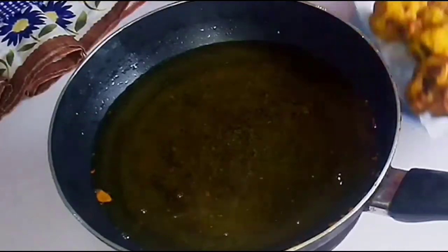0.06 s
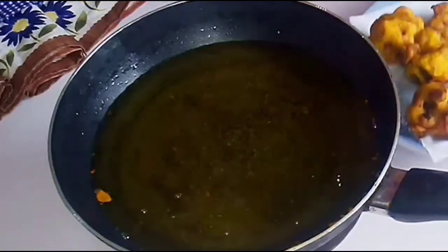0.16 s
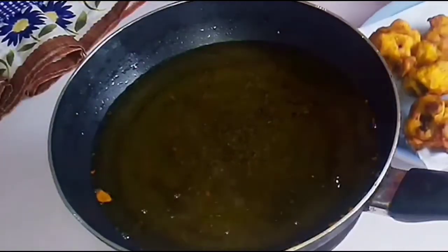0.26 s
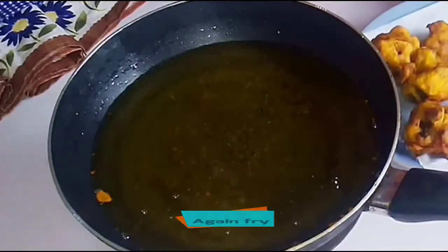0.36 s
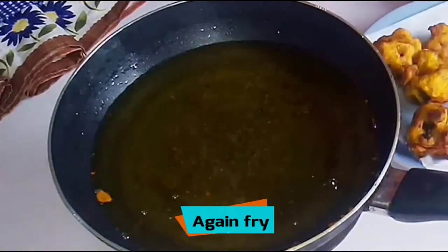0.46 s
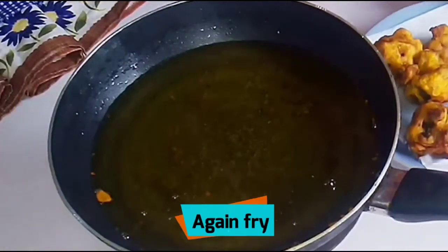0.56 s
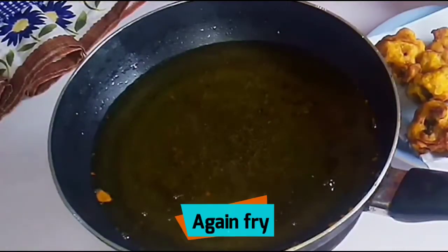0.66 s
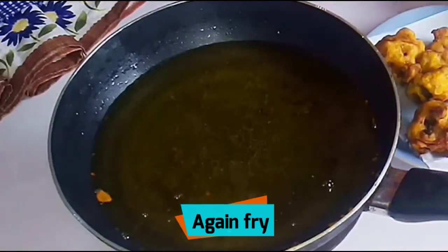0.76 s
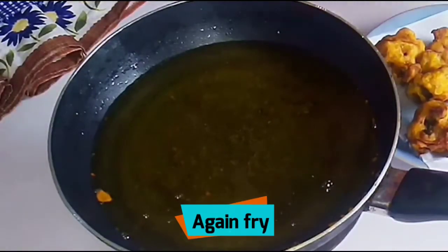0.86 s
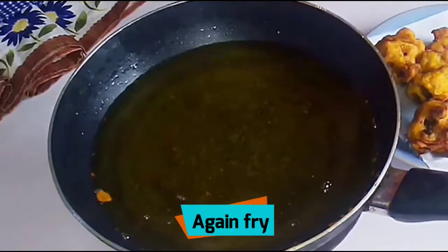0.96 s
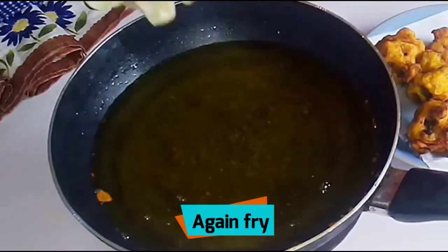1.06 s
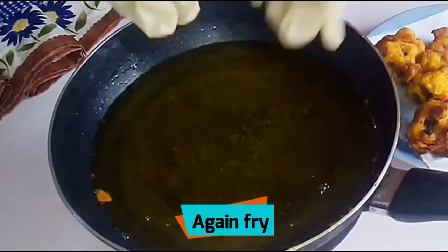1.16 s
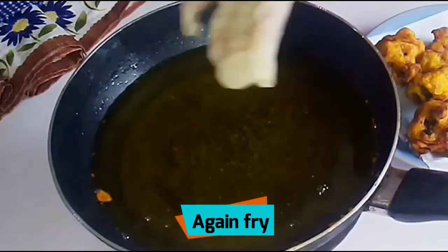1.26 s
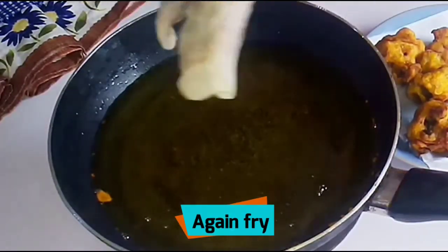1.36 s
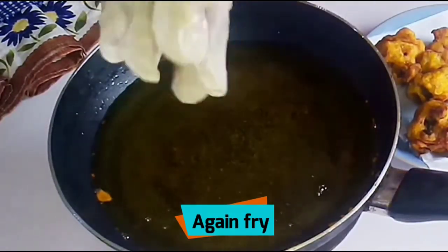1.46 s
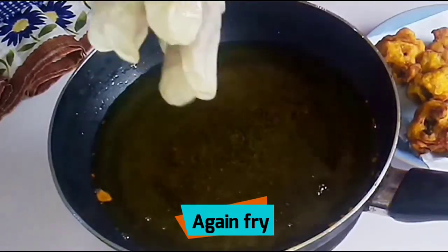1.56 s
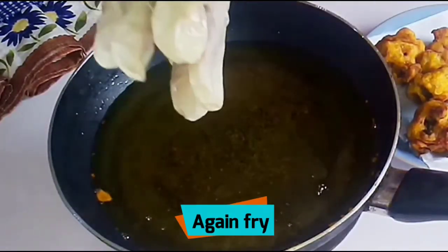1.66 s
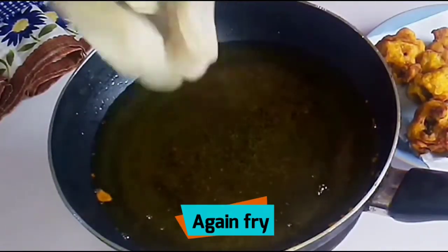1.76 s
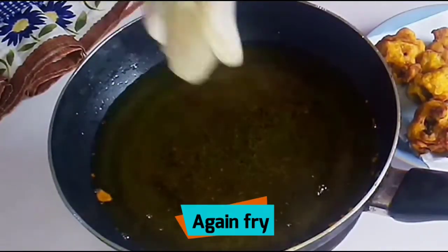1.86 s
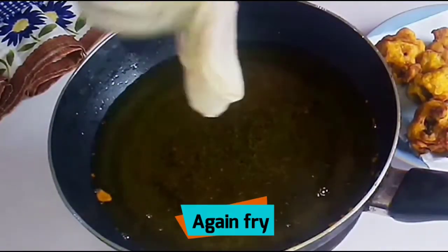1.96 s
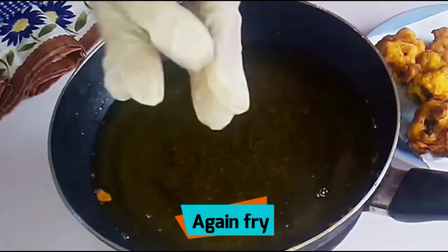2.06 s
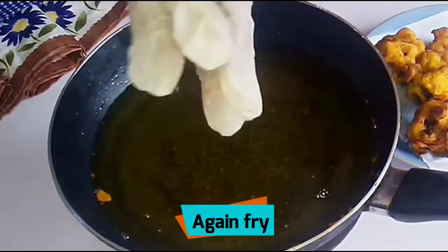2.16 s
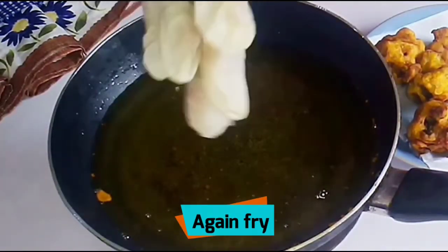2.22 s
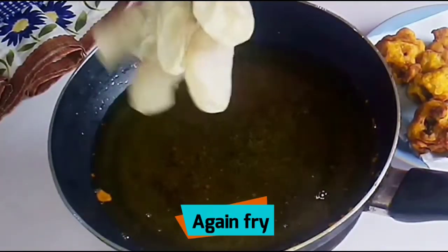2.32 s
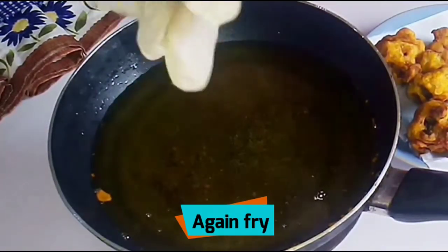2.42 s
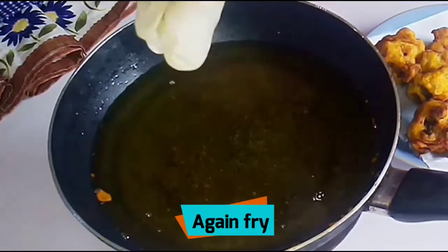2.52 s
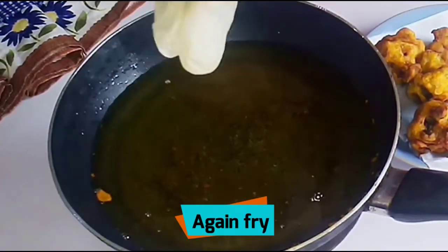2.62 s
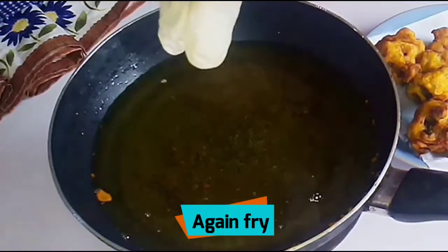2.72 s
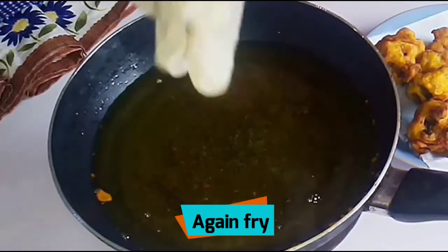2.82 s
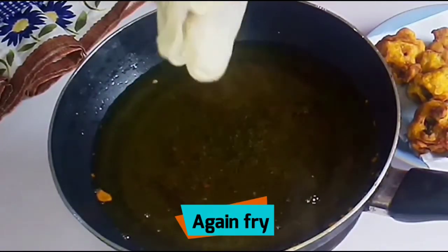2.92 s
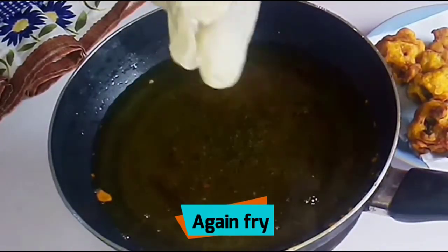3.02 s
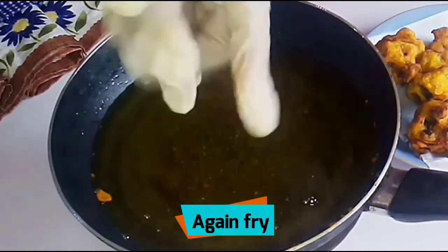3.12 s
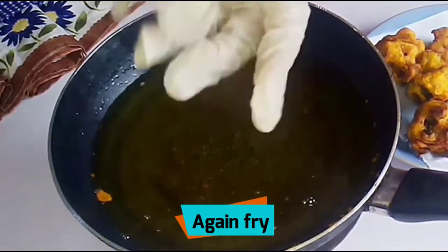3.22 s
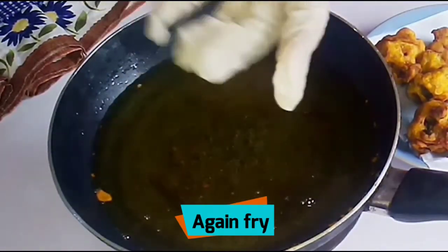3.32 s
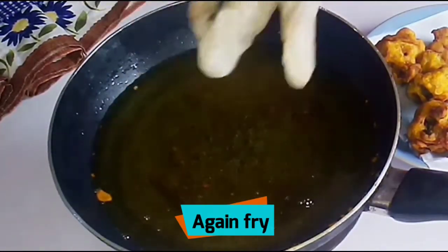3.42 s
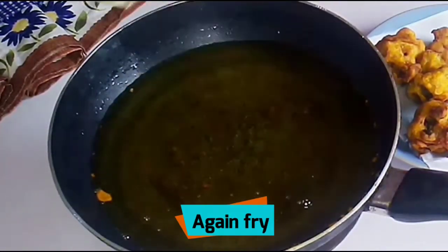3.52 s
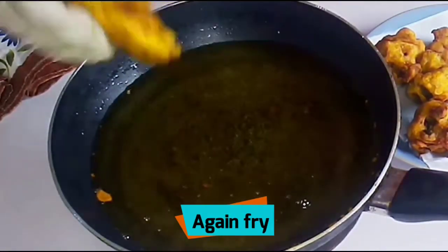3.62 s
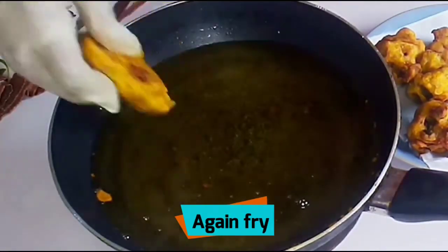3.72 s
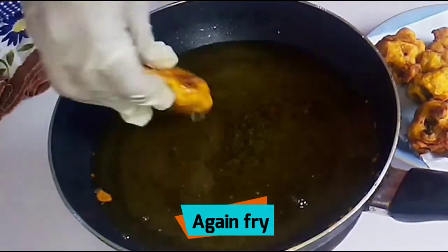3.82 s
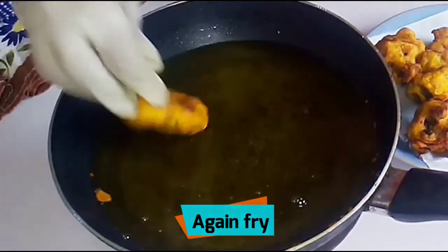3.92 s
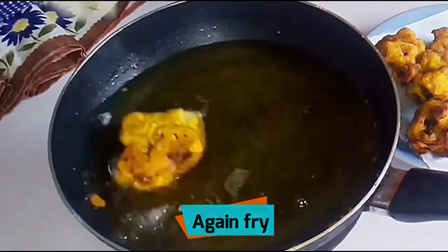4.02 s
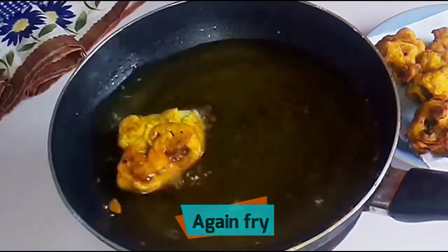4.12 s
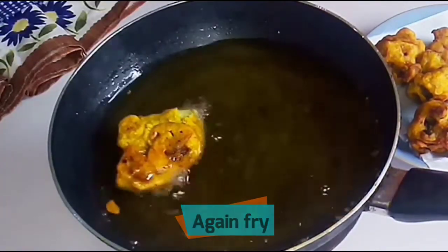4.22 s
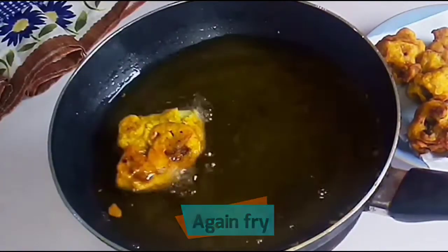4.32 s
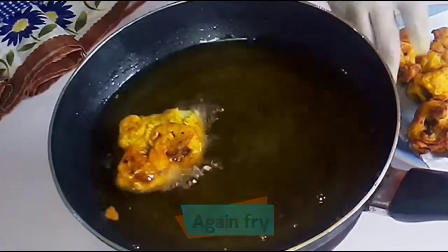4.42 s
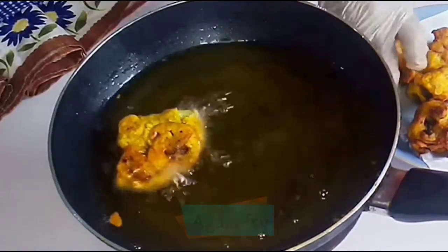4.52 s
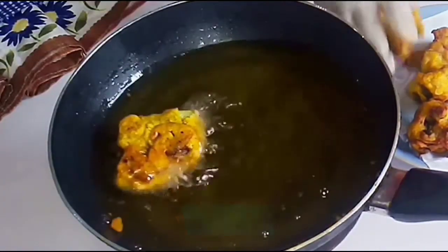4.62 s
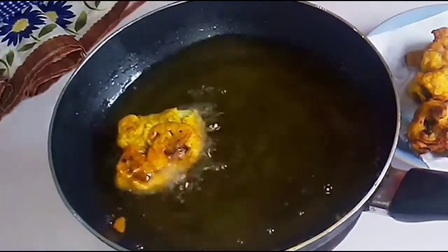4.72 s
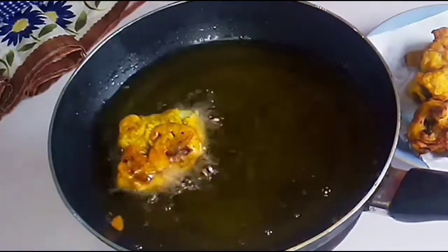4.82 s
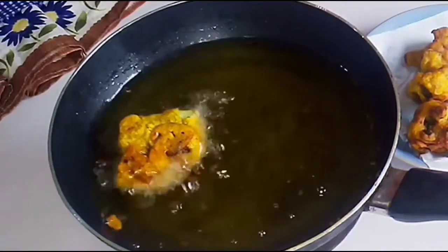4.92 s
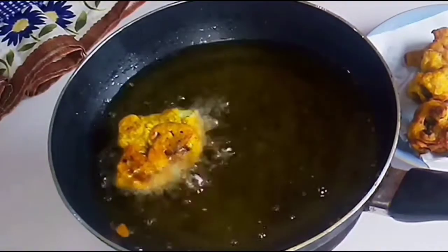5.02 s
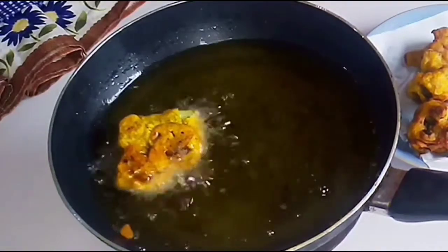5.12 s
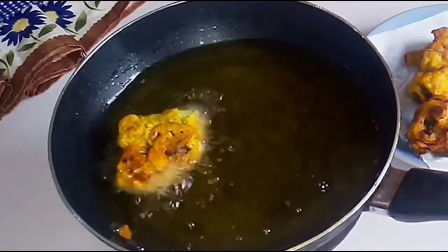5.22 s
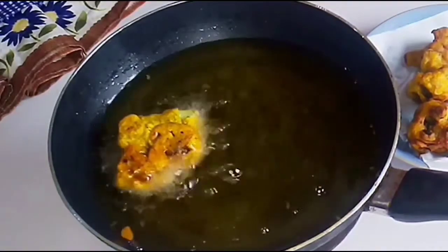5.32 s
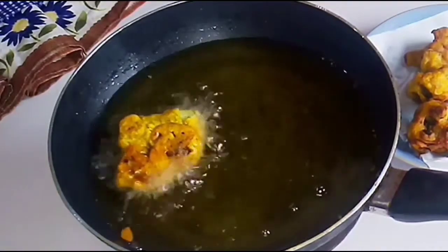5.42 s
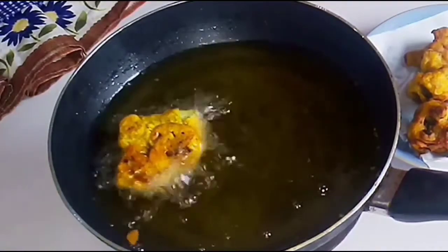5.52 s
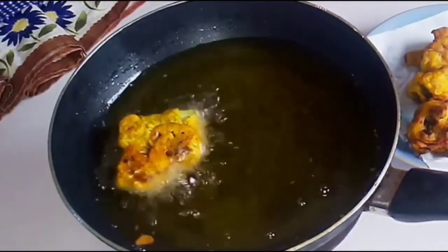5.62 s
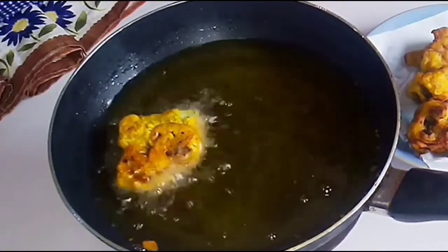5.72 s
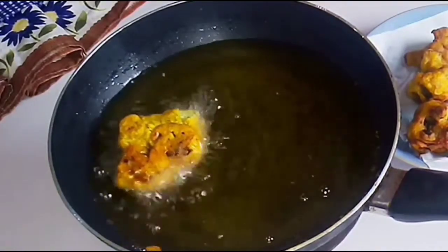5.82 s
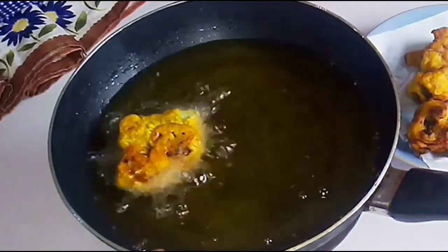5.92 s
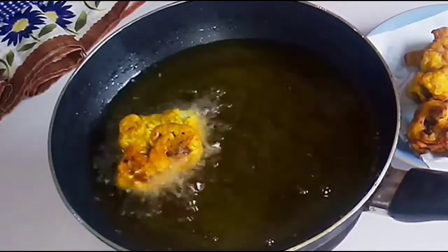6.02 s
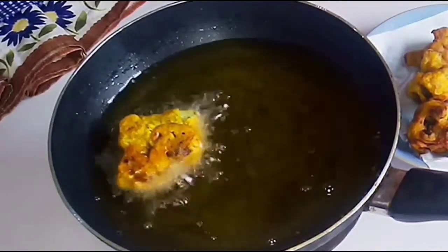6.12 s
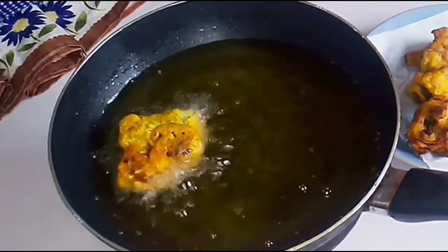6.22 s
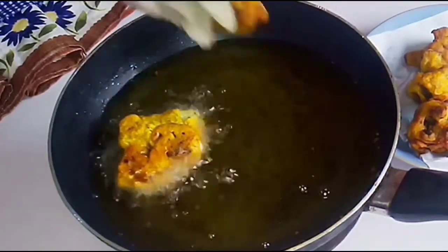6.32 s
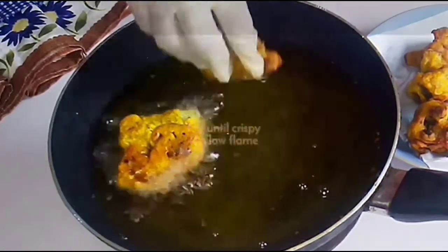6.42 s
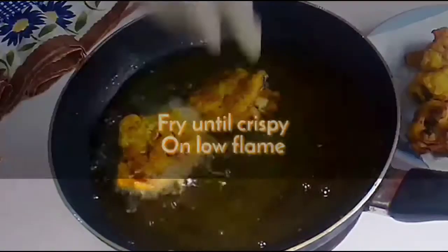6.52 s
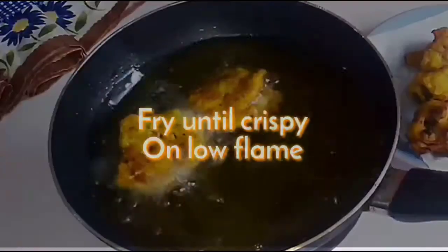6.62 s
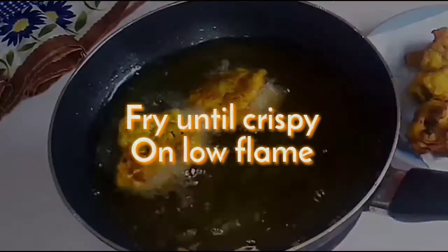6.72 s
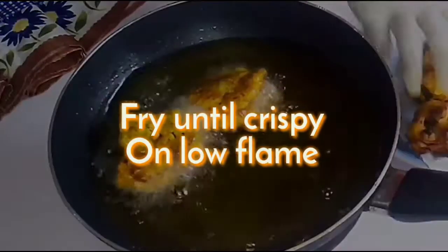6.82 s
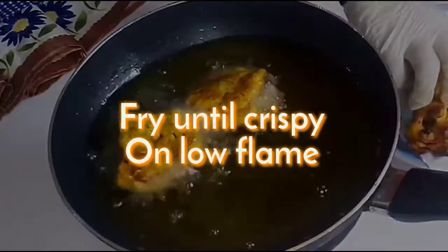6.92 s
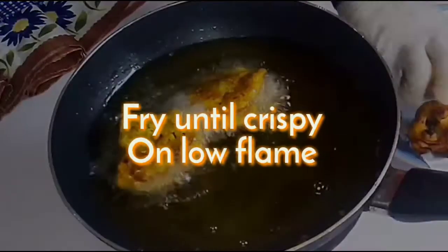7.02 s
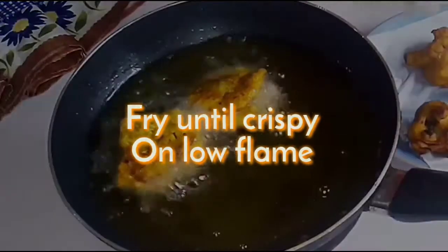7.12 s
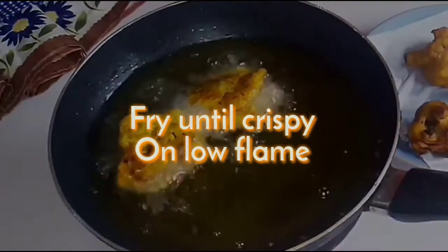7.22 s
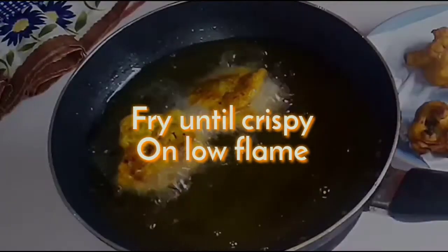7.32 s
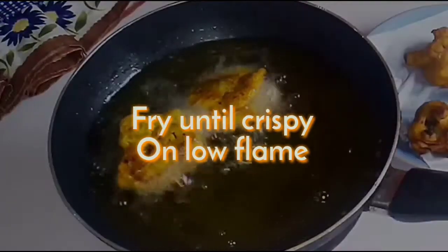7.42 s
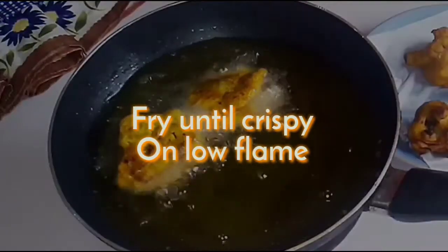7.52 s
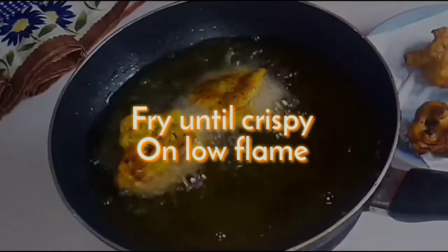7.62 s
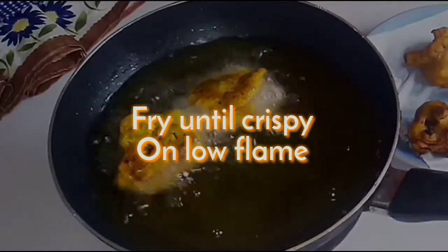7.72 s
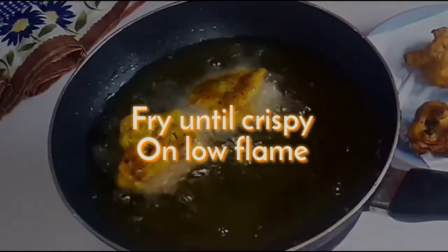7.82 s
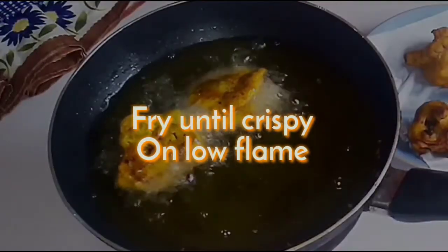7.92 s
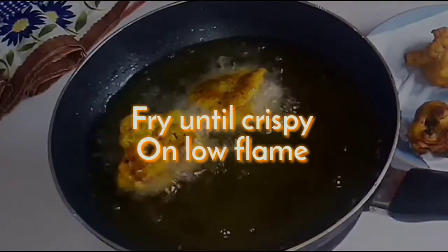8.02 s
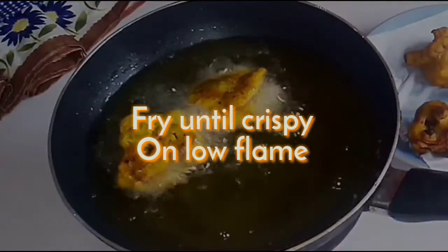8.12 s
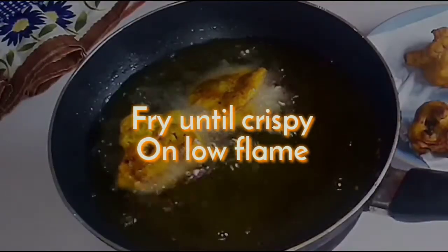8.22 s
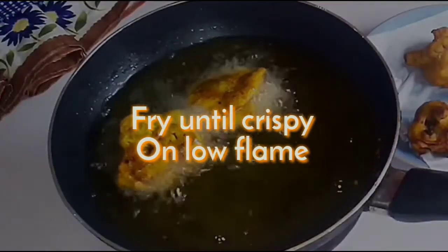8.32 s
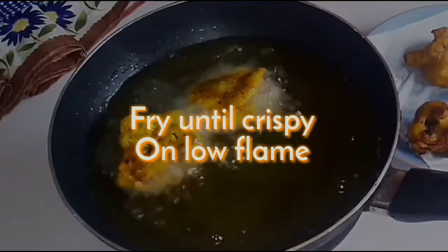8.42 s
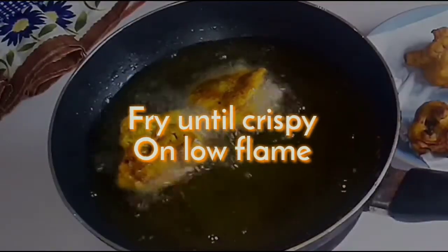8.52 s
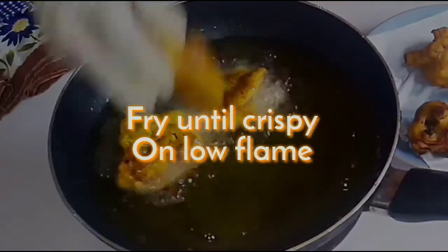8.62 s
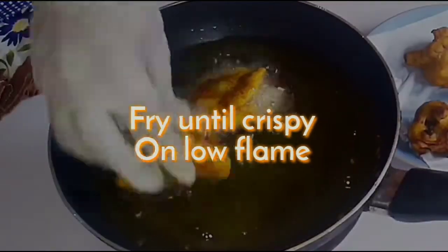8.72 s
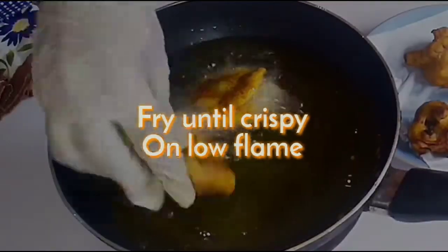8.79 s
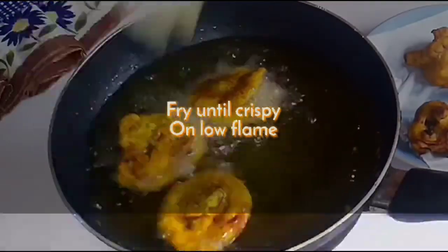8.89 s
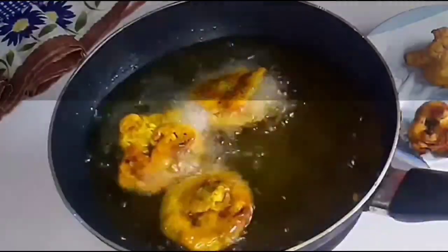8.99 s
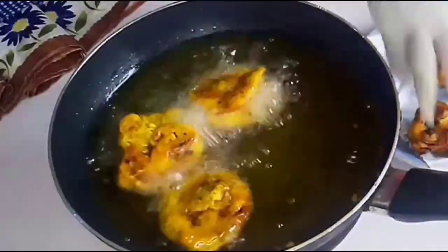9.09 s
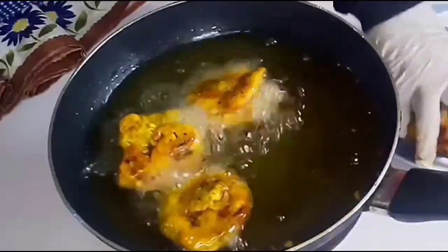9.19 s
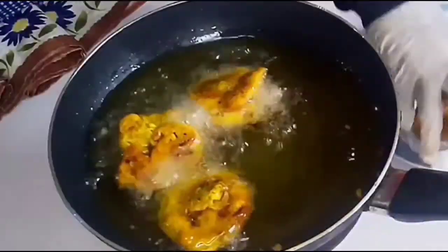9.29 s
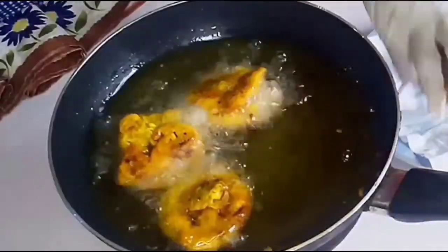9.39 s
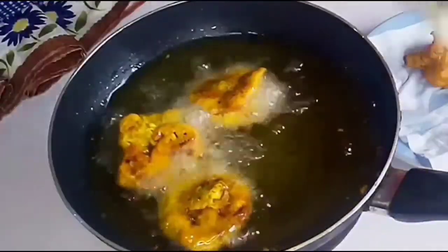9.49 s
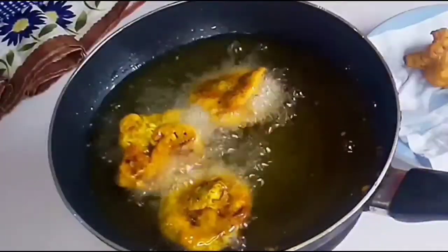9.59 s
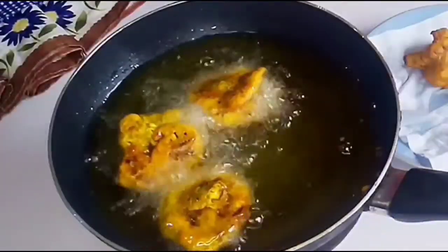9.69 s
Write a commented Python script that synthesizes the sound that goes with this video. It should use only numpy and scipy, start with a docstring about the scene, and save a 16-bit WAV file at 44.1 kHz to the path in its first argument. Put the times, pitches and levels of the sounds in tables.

```python
"""A battered fritter frying in a pan of hot oil, close to a stereo microphone and a little to its right.
Faint, echoing birdsong is heard first; after four seconds the frying fades in over two seconds.
Steam leaving the batter makes a dense fry of tiny bursts, ringing bubbles, splutters and popping spits
in a small kitchen, over churning oil and the ringing pan. It surges and lulls, then eases and dulls
a little as the crust dries. A faint hiss lies under it all."""
import sys
import numpy as np
from scipy import signal
from scipy.fft import rfft, irfft, next_fast_len
from scipy.io import wavfile
from scipy.ndimage import uniform_filter1d

SR = 44100
rng = np.random.default_rng(int(sys.argv[2]) if len(sys.argv) > 2 else 0)


def store_wav(level_fs):
    """Save 16-bit WAV to argv[1]."""
    pcm = np.round(np.clip(np.atleast_2d(level_fs), -1, 1) * 32767)
    wavfile.write(sys.argv[1], SR, pcm.T.astype(np.int16))


N = 429975
TIME = np.arange(N) / SR

FRY_START_S = 4.104
OPENING_END_S, OPENING_DB = 4.195, -1.5   # the first moment of the sizzle is a little weaker
# The sizzle fades in over two seconds to its full level, then eases as the crust dries.
FULL_DB, FADE_DEPTH_DB, FADE_TIME_CONSTANT_S, DRYING_DB_PER_S = -25.5, 24.5, 0.68, 0.4472
WET_TREBLE_DB, DULLING_DB_PER_S, TREBLE_HZ = 1.37, 0.2, 7060   # a wet crust spits brighter
# The low churning, relative to the sizzle: it starts weaker, catches up, then eases.
GURGLE_DB, GURGLE_ONSET_DB, GURGLE_BUILD_S, GURGLE_EASING_DB_PER_S = -15, -3.5, 0.14, 0.53
LEFT_LAG_S, CUTOFF_HZ = 5.6e-5, 15400   # delay of the microphone's left side; top of the treble
HIGH_PHRASE_END_S, HIGH_PHRASE_HZ = 2.575, 5800   # the highest bird notes break off here, echo and all

# Spectra of the sizzle, the churning oil and the faint hiss. Each row: frequency in Hz, level in dB.
SIZZLE_SPECTRUM = [(650, -29.5), (1100, -17.5), (1340, -19), (1460, -31), (1580, -47), (1820, -14),
                   (2450, -6), (3230, -3), (3680, 0), (5180, -1), (6740, -2.5), (10600, -4), (14200, -9),
                   (15200, -11)]
GURGLE_SPECTRUM = [(20, -14), (32, -3), (60, -8.5), (85, -8), (160, -9.5), (279, -11.5), (486, -9.5),
                   (591, -6.5), (794, -8.5), (905, -6.5), (1300, -9), (1450, -1), (1800, -1), (2340, -60),
                   (3960, -120)]
HISS_SPECTRUM = [(60, 1), (150, -13), (350, -6), (900, -5), (1400, -2.5), (2200, 9.5), (4000, -5),
                 (6500, -12), (15000, -21)]
# Surges and lulls of the steam.
# Each row: centre in seconds, half length in seconds, level change in dB, treble change in dB.
STEAM_SURGES = [(4.28, 0.025, 2.5, -0.5), (4.357, 0.02, 2, 0.5), (4.562, .03, 3.5, -6),
                (4.825, 0.017, -1.7, -3), (5.077, 0.017, 1.5, 1), (5.465, 0.056, -1.5, 0),
                (5.554, 0.062, 1.1, 0.5), (5.725, 0.016, -2.5, 4), (5.835, 0.054, 1.1, .5),
                (6.032, .05, 2.5, 0), (6.776, 0.026, 2, -5), (7.515, 0.079, -1.4, -0.5),
                (7.95, 0.068, -0.8, 1.5), (8.937, 0.041, -2.5, 2.5), (9.338, 0.067, -0.5, -1),
                (9.436, 0.018, 2, -1), (9.517, .025, -2.5, 1)]
# Big pockets of steam heave the oil, and between them it settles.
# Each row: centre in seconds, change of the low churning in dB.
OIL_HEAVES = [(5.26, 4), (5.37, 2.5), (5.67, 4.5), (5.72, 4.5), (5.77, 2), (5.825, 3.5), (6.11, 5),
              (6.245, 4), (6.5, 3.5), (6.9, 0), (7.04, 4.5), (7.32, 2.5), (7.775, 1), (7.93, 4.5),
              (8.02, -1.5), (8.06, 0), (8.945, 3), (8.74, -3), (9.36, 5), (9.525, -1.5)]
# Spits of oil. Each row: start in seconds, snap level in dB, ring pitch in Hz, ring level in dB.
OIL_SPITS = [(5.386, -30, 2200, -37), (5.5116, -18, 3680, -31), (6.231, -26, 1650, -31),
             (6.2963, -11, 3850, -34), (6.457, -30, 2020, -32), (6.609, -24, 4560, -22),
             (6.8, -17, 4070, -20), (7.091, -20, 3580, -38), (7.329, -28, 2060, -34),
             (7.3813, -10, 3350, -26), (7.45, -20, 4150, -21), (7.557, -26, 2520, -26),
             (7.836, -26, 1410, -40), (8.137, -23, 3270, -24), (8.457, -26, 2170, -28),
             (8.554, -22, 3760, -28), (8.7777, -20, 3530, -31), (8.839, -11, 3240, -21.5),
             (8.9478, -13, 3660, -26), (9.068, -10, 2740, -24.5), (9.2605, -16, 4000, -32),
             (9.435, -11, 2800, -37), (9.557, -9.5, 3260, -22)]
# Splutters of wet batter. Each row: centre in seconds, half length in seconds, level in dB.
BATTER_SPLUTTERS = [(6.231, 0.011, -35.5), (6.26, .018, -39.5), (6.562, 0.017, -42), (7.838, 0.022, -41),
                    (8.26, .02, -48), (9.04, .018, -45)]
# Modes of the pan. Each row: frequency in Hz, level in dB, time to fall 60 dB in seconds.
PAN_MODES = [(609, 1.5, 0.046), (911, 3.5, 0.046), (1468, 9, 0.051), (1705, 7, 0.05), (2070, 15.5, 0.016),
             (2486, 13.5, 0.026)]

# Faint bird calls, one table for each kind.
# Each row: start in seconds, length in seconds, level in dB, pitch shift in semitones.
CHIRPS = [(0, 0.028, -69, -0.84), (.088, .062, -61, 0.15), (.195, .058, -61, -0.34),
          (.35, 0.053, -60, 0.56), (.9, 0.046, -63.5, .5), (.994, 0.039, -58, .3), (1.165, 0.054, -59, 1)]
DOWNSLURS = [(.226, 0.02, -52.5, 0.5), (.374, 0.02, -59, 1.5), (.695, 0.025, -61, -1.2),
             (.742, 0.03, -61.5, -3), (.926, 0.027, -60.5, .5), (1.028, 0.016, -49.5, 0.8),
             (1.13, 0.036, -60, -2), (1.185, 0.018, -58, 0.2)]
WHISTLES = [(0, 0.028, -69, 1.5), (.705, 0.03, -61.5, 2.5), (2.555, 0.11, -59.5, -0.1),
            (3.1, 0.193, -63, -0.4), (3.63, 0.037, -75, 5.5)]
WARBLED_NOTES = [(.275, .04, -66, 5), (.53, 0.13, -66, -0.5), (.66, 0.12, -72, -3), (.79, .06, -66, -.6),
                 (1.07, 0.06, -64.5, 2.6), (1.19, .15, -61, -0.3), (1.355, .06, -63, 0.9),
                 (2.09, .11, -63.5, -0.7), (2.221, .08, -62, -0.3), (2.6, 0.075, -71.5, -2.5),
                 (3.07, 0.043, -69, -1.5), (3.15, .24, -68, -0.5)]
SAGGING_WHISTLES = [(.45, 0.1, -67, 0.2), (1.39, 0.1, -65.5, 0.3), (1.985, 0.052, -67, 2.5),
                    (2.01, 0.067, -66.5, 0.2), (2.29, 0.06, -62.5, -0.5), (2.515, 0.042, -64, 0.5)]
WHIPS = [(.338, 0.038, -71, 0), (.885, .045, -68, -5), (1.148, .03, -69.5, 1)]
LOW_SLURS = [(.715, 0.077, -78, -0.54), (2.12, 0.13, -78.5, 0.068), (2.88, .2, -88, 0)]
SWOOPS = [(1.47, 0.13, -67.5, 0.0039), (1.695, 0.09, -62, 0.0036)]
TWIN_NOTES = [(1.888, .13, -60.5, 0.0044), (2.117, 0.15, -62, 0.0051), (2.382, 0.17, -63, 0)]
UPSLURS = [(2.222, .12, -61, 0), (2.735, 0.12, -62.5, 0.016), (3.33, .115, -63, 0)]
CHIPS = [(2.224, .018, -55.5, 0.5), (2.308, 0.028, -60, -0.5), (2.365, 0.037, -64, 0.075),
         (2.417, 0.033, -64, 1), (2.47, 0.039, -72, -2), (2.517, 0.028, -63, -0.5), (2.6, .03, -67, -0.5),
         (2.642, 0.018, -69, 1), (2.94, .03, -75, -3.5), (3.948, 0.019, -67, 0)]
NASAL_CALLS = [(3.095, 0.08, -67.5, 0), (3.236, 0.068, -67, 0.09), (3.318, .058, -67.5, 0.3)]
TICKS = [(3.578, 0.024, -73, 0.11), (3.692, 0.026, -68, -0.33), (3.855, 0.012, -74, .5)]
PIPS = [(3.768, .04, -58, .7), (3.921, 0.04, -57.5, -0.11)]
# How each kind is sung; swoops, twin notes and upslurs have two voices. Each row: calls, pitch contour
# in Hz, harmonic levels in dB, rasp from 0 to 1, warble as a share of the pitch, echo level in dB.
BIRD_VOICES = [(CHIRPS, [1698, 2696, 3350, 3740, 3183, 2100], [0], 0.66, .03, 1.2),
               (DOWNSLURS, [3810, 3555, 3190, 2600], [0], 0.31, .015, -1.5),
               (WHIPS, [1530, 3570, 4900, 5170, 6760], [0], 0.34, .01, 5.4), (WHISTLES, [2840, 2920, 2940],
               [0], 0.18, 0.0071, 3.7), (WARBLED_NOTES, [2800, 2900, 3100], [0], 0.32, .05, 3.6),
               (SAGGING_WHISTLES, [3000, 2680, 2450], [0], 0.3, 0.023, 5.4), (LOW_SLURS, [2400, 1900, 1680],
               [0], .3, 0.04, 1.3), (SWOOPS, [5400, 6700, 6950, 7600, 8050], [-2.5], 0.43, .025, 2.6),
               (SWOOPS, [4600, 5450, 5600, 5600, 5420], [-1], 0.36, .02, 3.5),
               (TWIN_NOTES, [7070, 6500, 6170, 5980], [0], 0.12, 0.0044, -1),
               (TWIN_NOTES, [4490, 5280, 5220, 5230], [-2.5], 0.12, .003, 3.6),
               (UPSLURS, [4100, 4675, 5030, 5340, 5490], [-2.5], .12, .01, 6.4),
               (UPSLURS, [3850, 4300, 4580, 4900, 5050], [-7], 0.2, .015, 3.2),
               (CHIPS, [4900, 4390, 3910, 3450], [-1], .5, .035, 2.7),
               (NASAL_CALLS, [619, 750, 790, 717, 610], [-29, -6, -2.5, 1.5, -18, -4], 0.15, .004, -4),
               (TICKS, [6200, 7660, 7240, 5000], [0], 0.15, .003, -1.2),
               (PIPS, [1600, 2270, 2870, 3075, 2860, 2900], [.5], 0.33, .01, -3.5)]


def frying():
    """The pan, close up: the sizzle fades in to its full level; steam leaves the crust in surges."""
    age = np.maximum(TIME - FRY_START_S, 0)
    level_db = FULL_DB - FADE_DEPTH_DB * np.exp(-age / FADE_TIME_CONSTANT_S) - DRYING_DB_PER_S * age
    level_db += OPENING_DB * (TIME < OPENING_END_S)
    fullness = from_db(0.36 * (level_db - FULL_DB))   # the texture is thinner while it is quiet
    surge_db = sum(db * bump(s, half_s) for s, half_s, db, _ in STEAM_SURGES)
    treble_db = WET_TREBLE_DB - DULLING_DB_PER_S * age
    treble_db += sum(db * bump(s, half_s) for s, half_s, _, db in STEAM_SURGES)
    churn_db = GURGLE_DB + GURGLE_ONSET_DB * np.exp(-age / GURGLE_BUILD_S) - GURGLE_EASING_DB_PER_S * age
    churn_db += sum(db * bump(s, half_s=0.018) for s, db in OIL_HEAVES)
    sizzle = from_db(1.69) * brighten(fizz(fullness), treble_db)
    sizzle += from_db(-4 + drift(21)) * fullness * bubbles()
    churn = from_db(churn_db) * (from_db(-4.5) * gurgle(fullness) + from_db(-3.5) * pan_ring(fullness))
    oil = sizzle * from_db([[0.6], [1.4]]) + churn * from_db([[-1.2], [1.9]])   # louder on the right
    return oil * from_db(level_db + surge_db) * (TIME > FRY_START_S) + spits() + splutters()


def fizz(fullness):
    """Thousands of steam pockets a second crack open at the crust, in uneven clusters."""
    per_s = 11000 * fullness * from_db(2.2 * drift(110))
    cracks = kitchen(bursts(per_s, spread_db=12), t60=0.59, wet_db=4)
    return colour(cracks, SIZZLE_SPECTRUM, 1620, 13850, flicker_db=1.34, flicker_hz=22, bands=8)


def bubbles(count=1700, middle_hz=3850, pitch_spread=0.42, size_db=2, t60=0.11, rise=0.046):
    """Larger bubbles ring briefly, each at its own pitch, rising as it nears the surface."""
    t, out = TIME[:SR // 20], np.zeros((2, N + SR // 20))
    chance = rng.random((count, 3))   # moment, left phase, right phase
    scatter = np.clip(rng.standard_normal((count, 3)), -2, 2)   # size, left level, right level
    pitches = np.minimum(middle_hz * np.exp(pitch_spread * rng.standard_normal(count)), CUTOFF_HZ)
    gains = from_db(at_hz(SIZZLE_SPECTRUM, pitches)[:, None] + size_db * scatter[:, :1]
                    + 1.7 * scatter[:, 1:])
    gains = gains * np.exp(2j * np.pi * chance[:, 1:])   # reflections give each side its own phase
    glide = 2j * np.pi * (t + rise * t ** 2 / (2 * t60))
    decay = from_db(-60 * t / t60)
    for when, hz, gain in zip(chance[:, 0], pitches, gains):
        at = int((FRY_START_S + when * (N / SR - FRY_START_S)) * SR)
        out[:, at:at + len(t)] += np.imag(gain[:, None] * np.exp(hz * glide)) * decay
    return rms_one(out[:, :N]) * np.sqrt(1 - FRY_START_S * SR / N)   # rms 1 over the frying time


def spits(snap_t60=0.026, ring_t60=0.053, rise=0.034):
    """Water droplets burst at the surface: a volley of snaps, and the open bubble rings, rising."""
    volleys, rings = np.zeros((2, N))
    t = TIME[:SR // 10]
    glide = t + rise * t ** 2 / (2 * ring_t60)
    for s, snap_db, hz, ring_db in OIL_SPITS:
        at = round(s * SR) + np.arange(len(t))
        volleys[at] += from_db(snap_db - 60 * t / snap_t60)
        rings[at] += from_db(ring_db - 60 * t / ring_t60) * np.sin(2 * np.pi * hz * glide)
    snaps = band(kitchen(volleys * rng.standard_normal(N), t60=0.07, wet_db=-15), 3200, 6600)
    return from_db(-1) * snaps + at_microphone(rings) + from_db(-0.5) * echoes(rings, t60=0.15)


def splutters():
    """A wet lump of batter lets its steam go at once: a short flurry of coarse, low-pitched bursts."""
    strength = sum(from_db(db) * bump(s, half_s) for s, half_s, db in BATTER_SPLUTTERS)
    flurry = kitchen(bursts(per_s=900, spread_db=2.5), t60=0.08, wet_db=1)
    return strength * rms_one(band(flurry, 750, 2300)) * from_db([[-1.2], [1.2]])


def gurgle(fullness):
    """Escaping steam churns the oil: soft, low puffs."""
    puffs = kitchen(bursts(320 * fullness, spread_db=1.5), t60=0.22, wet_db=0)
    return high_pass(colour(puffs, GURGLE_SPECTRUM, 60, 1200, flicker_db=1.8, flicker_hz=12, bands=5), 19)


def pan_ring(fullness):
    """Bursts against the metal keep the modes of the pan sounding."""
    knocks = kitchen(bursts(220 * fullness, spread_db=0), t60=0.2, wet_db=2)
    return rms_one(sum(from_db(db) * ring(knocks, hz, t60) for hz, db, t60 in PAN_MODES))


def birds(rasp_depth=0.069, husk_db=-1, fade_share=0.31):
    """Faint whistles follow their contours; warble bends the pitch, rasp flutters it and adds hiss."""
    direct, far = np.zeros((2, 2, N))   # each holds the lower notes and the high phrase apart
    flutter, wobble = drift(400), drift(90)
    low_husk, high_husk = rng.standard_normal((2, N))
    husk = rms_one(band(band(low_husk, 2300, 4700), 2300, 4700))
    husk += from_db(-11.5) * rms_one(band(high_husk, 4200, 4800))
    for calls, contour_hz, harmonics_db, rasp, warble, echo_db in BIRD_VOICES:
        for s, length_s, db, semitones in calls:
            at = round(s * SR) + np.arange(round(length_s * SR))
            progress = np.linspace(0, 1, len(at))
            contour = np.interp(progress, np.linspace(0, 1, len(contour_hz)), contour_hz)
            hz = uniform_filter1d(contour, size=len(at) // 6) * 2 ** (semitones / 12)
            bend = 1 + warble * wobble[at] + rasp_depth * rasp * flutter[at]
            phase = 2 * np.pi * np.cumsum(hz * bend) / SR
            tone = sum(gain * np.sin(k * phase) for k, gain in enumerate(from_db(harmonics_db), 1))
            envelope = np.sin(np.pi / 2 * np.minimum(np.minimum(progress, 1 - progress) / fade_share, 1))
            note = from_db(db) * envelope * (tone + from_db(husk_db) * rasp ** 2 * husk[at])
            is_high = int(hz.mean() > HIGH_PHRASE_HZ and s < HIGH_PHRASE_END_S)
            direct[is_high, at] += note
            far[is_high, at] += from_db(echo_db) * note
    # a short echo smears each note; the long echo carries it on
    rest, high = (echoes(near, t60=0.055) + echoes(sent, t60=1.56) for near, sent in zip(direct, far))
    still_singing = np.clip((HIGH_PHRASE_END_S - TIME) / 0.005, 0, 1)
    song = high_pass(rest + high * still_singing, 1250)
    treble_cut = signal.butter(10, 8300, fs=SR, output="sos")
    return from_db([[6.5], [4]]) * signal.sosfilt(treble_cut, song)   # louder on the left


def faint_hiss():
    """A barely audible, even hiss."""
    noise = rng.standard_normal((2, N))
    hiss = colour(noise, HISS_SPECTRUM, 100, 8000, flicker_db=0, flicker_hz=2.9, bands=2)
    return from_db(-78.5) * high_pass(hiss, 40)


def kitchen(clicks, t60, wet_db):
    """Every burst takes its own paths round the room: a diffuse wash follows their dying energy."""
    keep = from_db(-120 / (t60 * SR))
    energy = signal.lfilter([1 - keep], [1, -keep], clicks ** 2 + 1e-18)
    return at_microphone(clicks) + from_db(wet_db) * np.sqrt(energy) * rng.standard_normal((2, N))


def echoes(x, t60):
    """A diffuse tail, different on each side, falling 60 dB in t60 seconds."""
    t = TIME[TIME < 1.2 * t60]
    tails = rng.standard_normal((2, len(t))) * from_db(-60 * t / t60)
    return signal.oaconvolve(x[None], rms_one(tails) / np.sqrt(len(t)), axes=1)[:, :N]


def at_microphone(x):
    """The pan stands to the right, so its direct sound reaches the left side a little later."""
    taps = np.arange(-16, 17) - LEFT_LAG_S * SR
    return np.array([np.convolve(x, np.sinc(taps) * np.sinc(taps / 16), "same"), x])


def bursts(per_s, spread_db):
    """Clicks at random moments; a wider spread sets a few large ones among many small."""
    sizes = from_db(spread_db * np.minimum(rng.exponential(1, N), 3)) * rng.choice([-1, 1], N)
    return sizes * (rng.random(N) < per_s / SR)


def ring(clicks, hz, t60):
    """A unit click sets a sine of height 1 ringing."""
    r, w = from_db(-60 / (t60 * SR)), 2 * np.pi * hz / SR
    return signal.lfilter([0, np.sin(w)], [1, -2 * r * np.cos(w), r * r], clicks + 1e-18)


def colour(x, spectrum, low_hz, high_hz, flicker_db, flicker_hz, bands):
    """Split into overlapping bands that flicker each on its own, under one spectrum; rms 1."""
    size = next_fast_len(N, True)
    hz = np.maximum(np.arange(size // 2 + 1) * SR / size, 1)
    shaped = rfft(x, size) * from_db(at_hz(spectrum, hz))
    place = np.interp(np.log(hz), np.log([low_hz, high_hz]), [0, bands - 1])
    out = 0
    for k in range(bands):
        part = irfft(shaped * np.maximum(1 - abs(place - k), 0), size)[..., :N]
        out = out + part * from_db(flicker_db * drift(flicker_hz))
    return rms_one(out)


def drift(hz):
    """A random wander with spread 1: coarse noise twice through a one-pole low-pass."""
    r = np.exp(-40 * np.pi * hz / SR)   # one step every 20 samples
    slow = signal.lfilter([1], [1, -2 * r, r * r], rng.standard_normal(N // 20 + 4002))[4000:]
    return np.interp(np.arange(N) / 20, np.arange(len(slow)), rms_one(slow))


def bump(s, half_s):
    """A smooth rise and fall of height 1 around a moment."""
    out = np.zeros(N)
    near = slice(*np.searchsorted(TIME, [s - 4 * half_s, s + 4 * half_s]))
    out[near] = np.exp(-((TIME[near] - s) / half_s) ** 2)
    return out


def brighten(x, db):
    """A treble shelf whose gain may move."""
    treble = signal.sosfilt(signal.butter(1, TREBLE_HZ, "high", fs=SR, output="sos"), x)
    return x + (from_db(db) - 1) * treble


def band(x, low_hz, high_hz):
    """Gentle band-pass."""
    return signal.sosfilt(signal.butter(2, [low_hz, high_hz], "band", fs=SR, output="sos"), x + 1e-18)


def high_pass(x, hz):
    """Steep low cut."""
    return signal.sosfilt(signal.butter(8, hz, "high", fs=SR, output="sos"), x)


def at_hz(spectrum, hz):
    """Read a spectrum on a log-frequency axis."""
    known_hz, db = np.transpose(spectrum)
    return np.interp(np.log(hz), np.log(known_hz), db)


def from_db(db):
    """Decibels to gain."""
    return 10 ** (np.asarray(db) / 20)


def rms_one(x):
    """Scale to rms 1."""
    return x / np.sqrt(np.mean(x ** 2) + 1e-20)


def scene():
    """Faint, echoing birdsong, then close frying fades in, over a faint hiss."""
    return birds() + frying() + faint_hiss()


def record(dry):
    """The highest treble is cut steeply."""
    return signal.sosfilt(signal.ellip(14, 0.1, 110, CUTOFF_HZ, fs=SR, output="sos"), dry)


dry = scene()
out = record(dry)
store_wav(out)
```